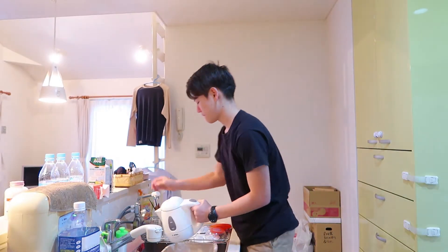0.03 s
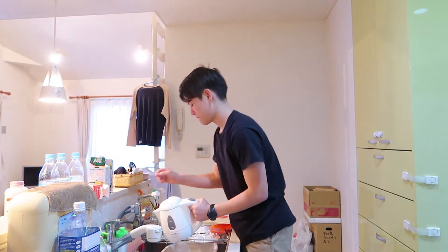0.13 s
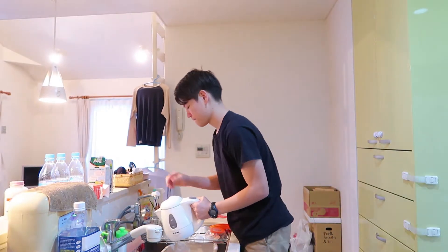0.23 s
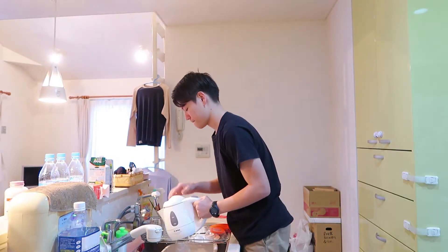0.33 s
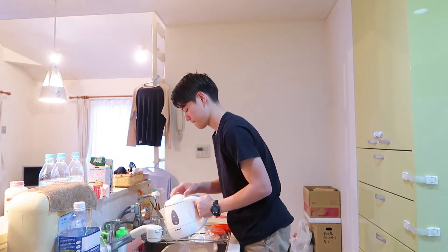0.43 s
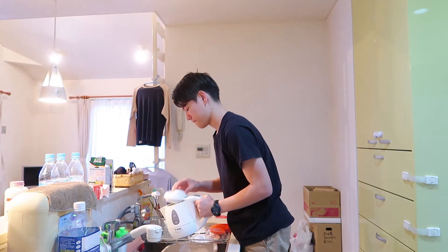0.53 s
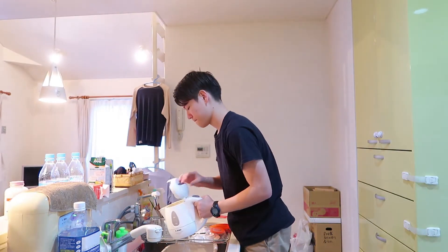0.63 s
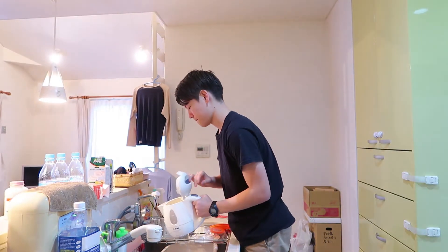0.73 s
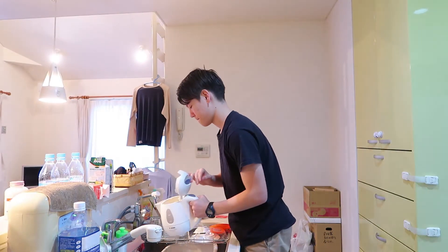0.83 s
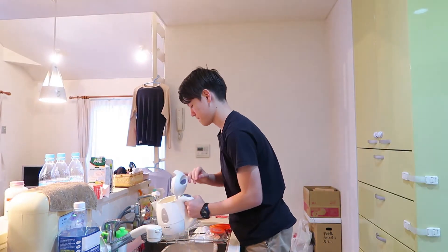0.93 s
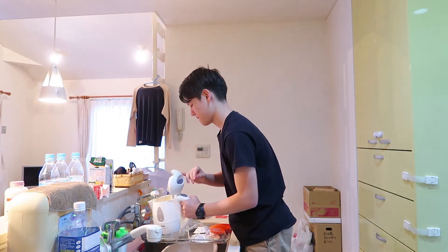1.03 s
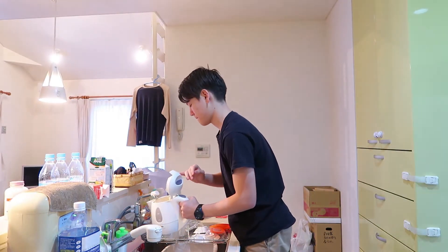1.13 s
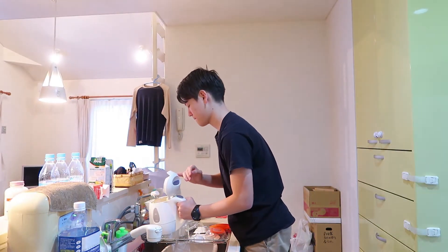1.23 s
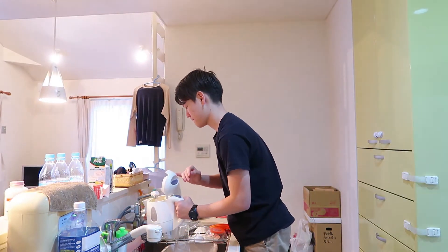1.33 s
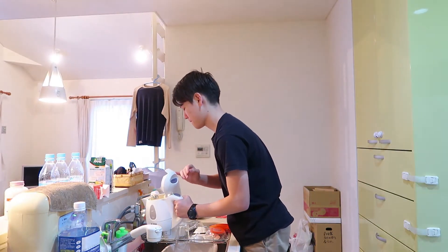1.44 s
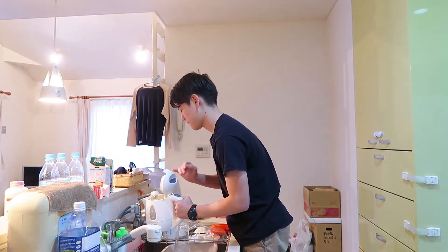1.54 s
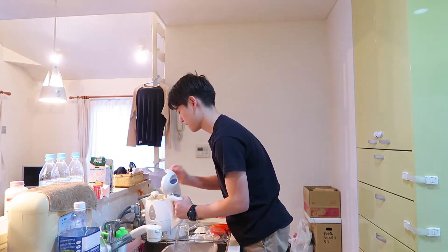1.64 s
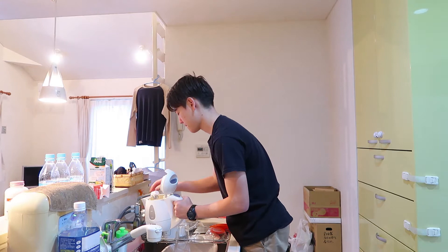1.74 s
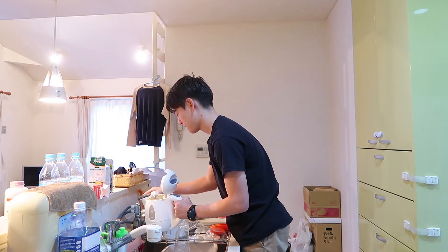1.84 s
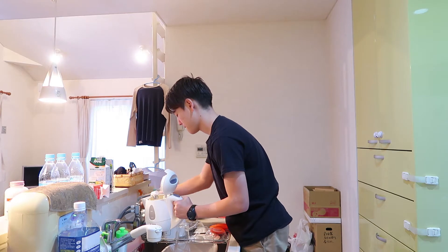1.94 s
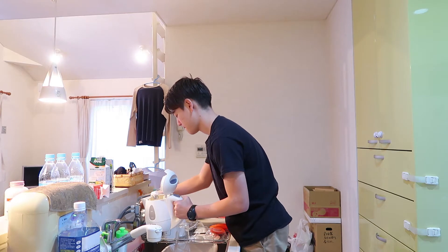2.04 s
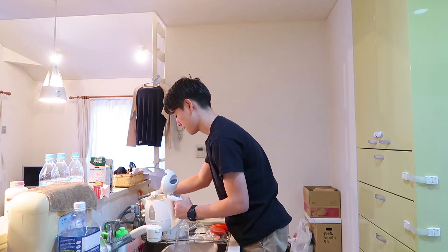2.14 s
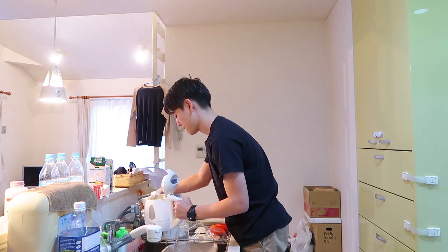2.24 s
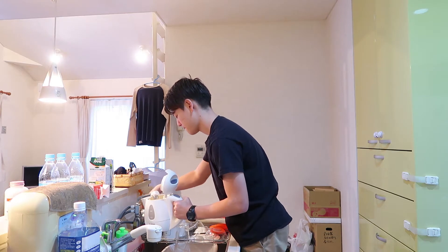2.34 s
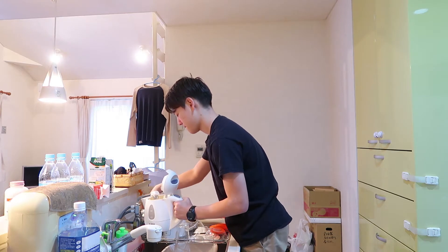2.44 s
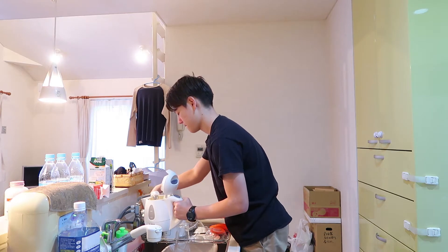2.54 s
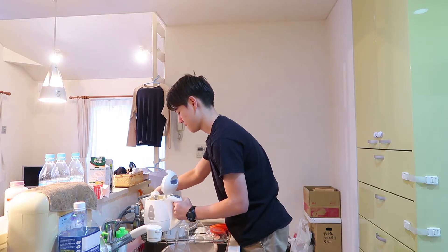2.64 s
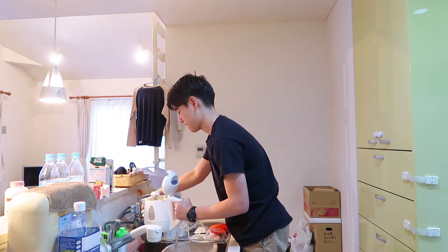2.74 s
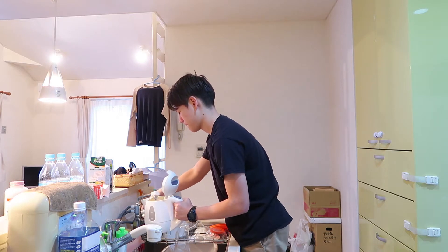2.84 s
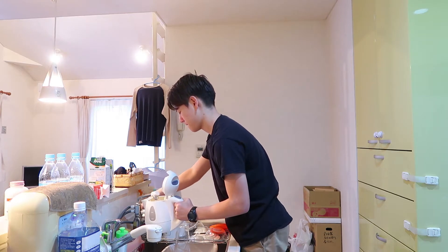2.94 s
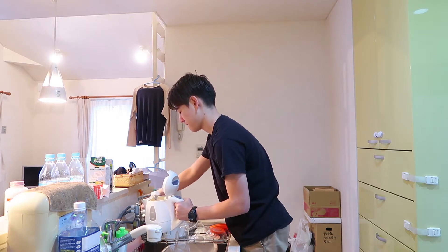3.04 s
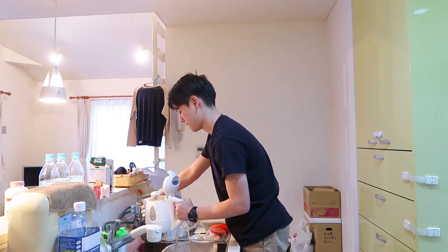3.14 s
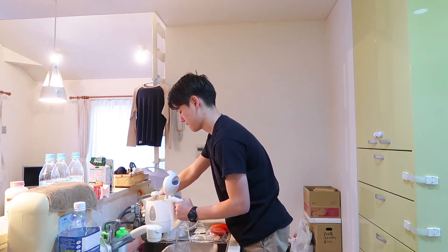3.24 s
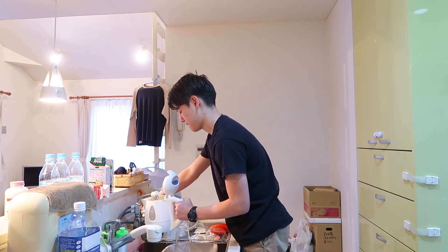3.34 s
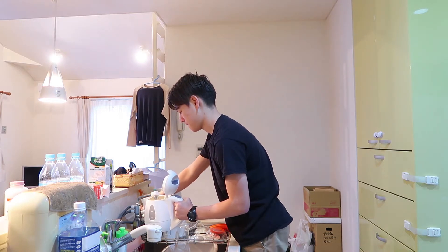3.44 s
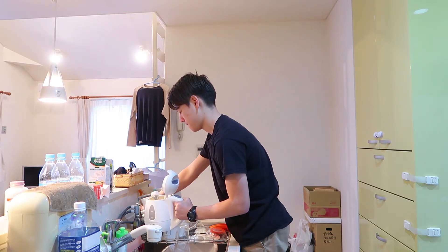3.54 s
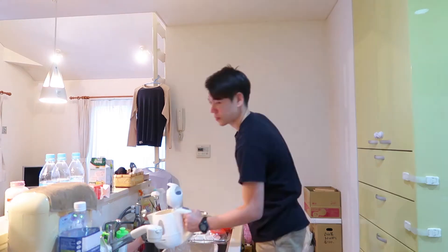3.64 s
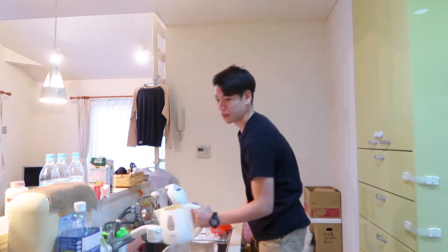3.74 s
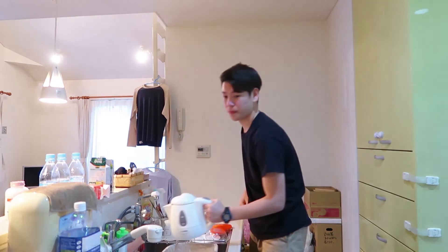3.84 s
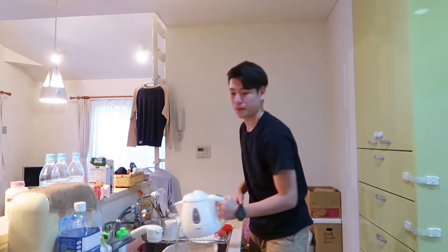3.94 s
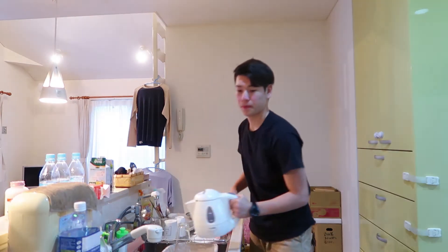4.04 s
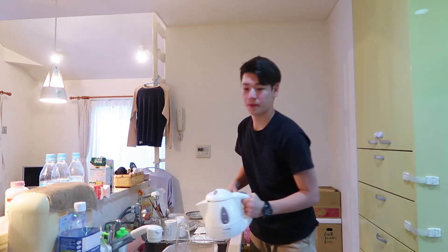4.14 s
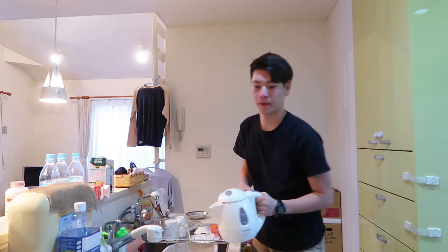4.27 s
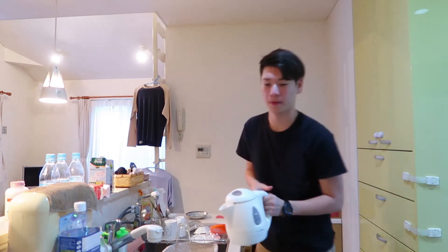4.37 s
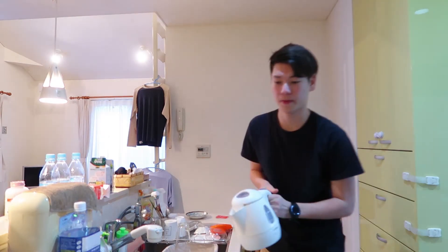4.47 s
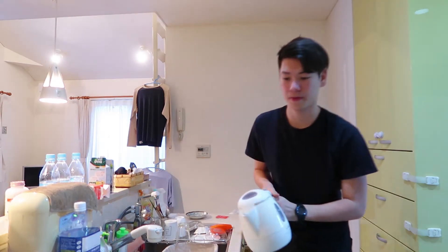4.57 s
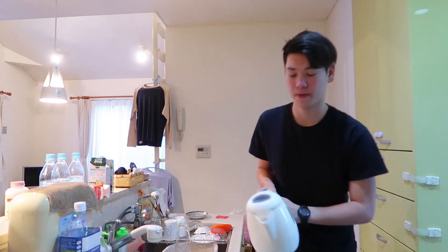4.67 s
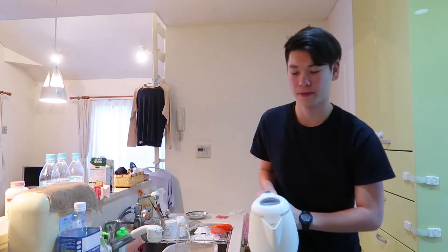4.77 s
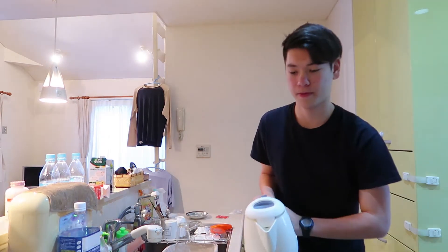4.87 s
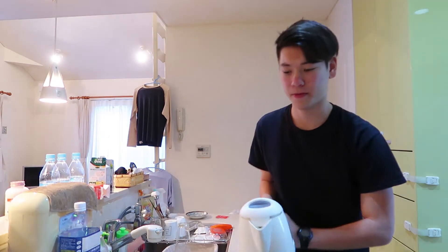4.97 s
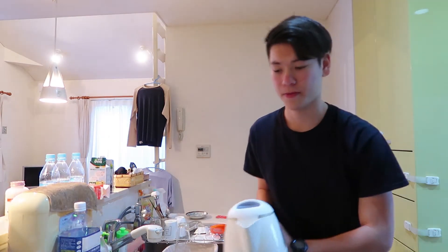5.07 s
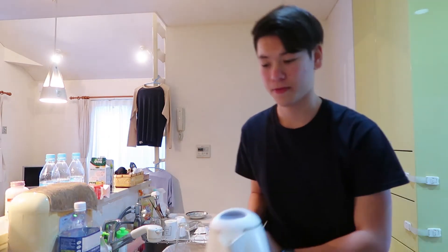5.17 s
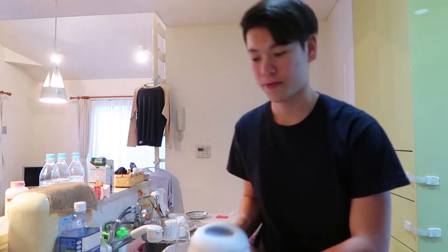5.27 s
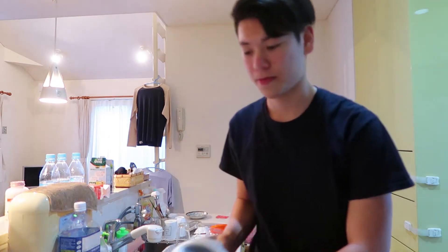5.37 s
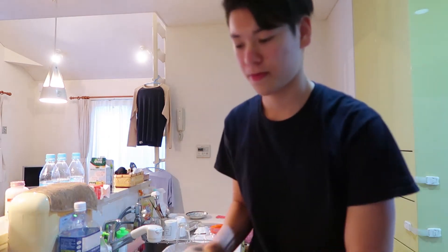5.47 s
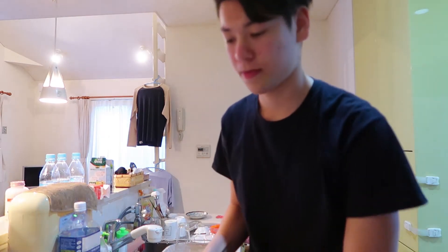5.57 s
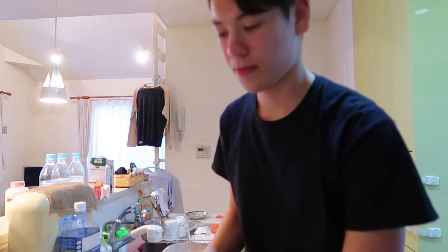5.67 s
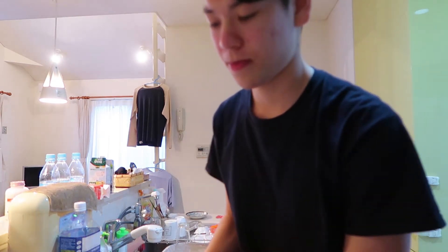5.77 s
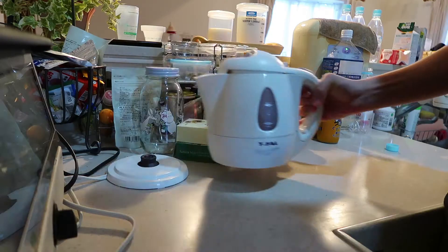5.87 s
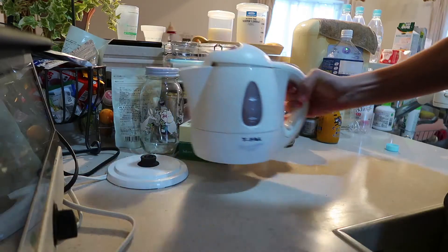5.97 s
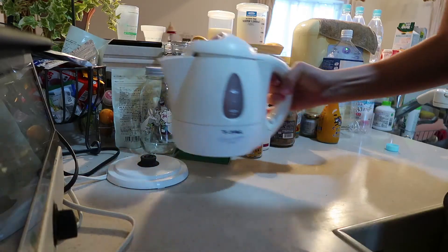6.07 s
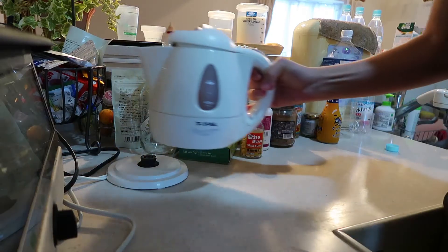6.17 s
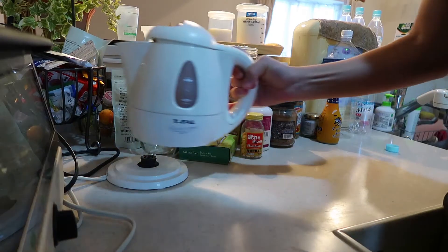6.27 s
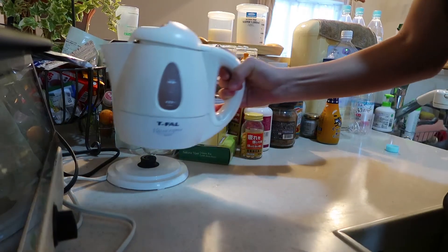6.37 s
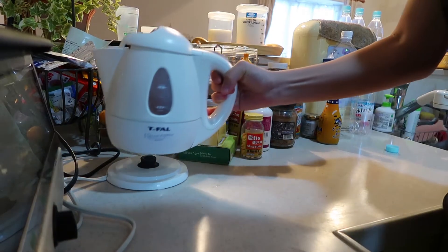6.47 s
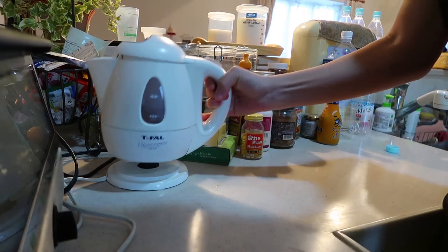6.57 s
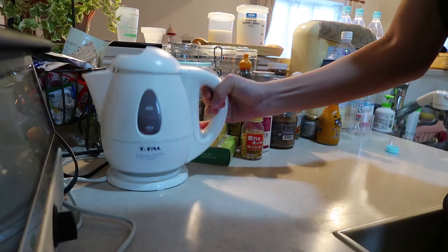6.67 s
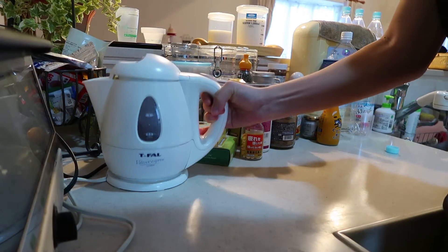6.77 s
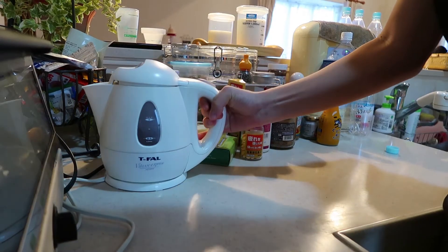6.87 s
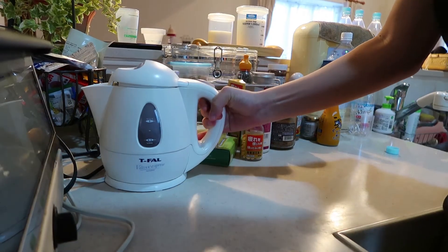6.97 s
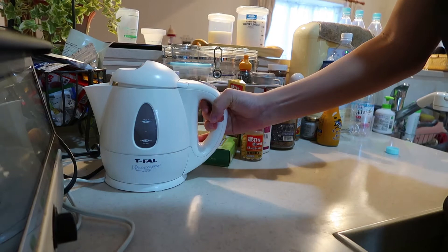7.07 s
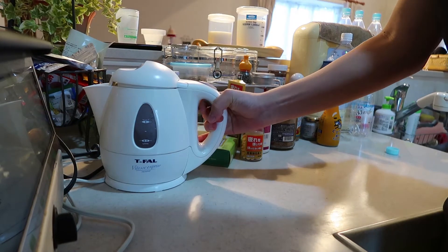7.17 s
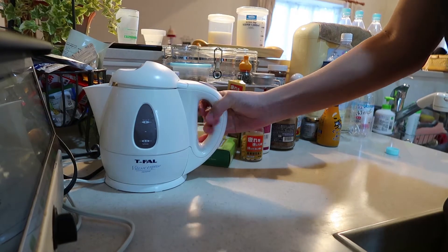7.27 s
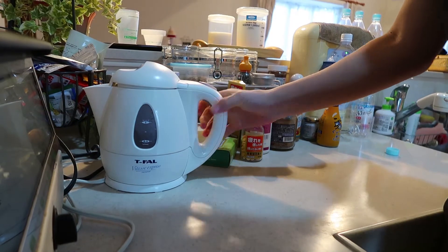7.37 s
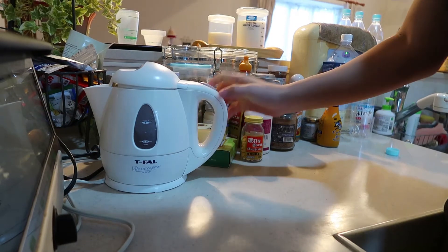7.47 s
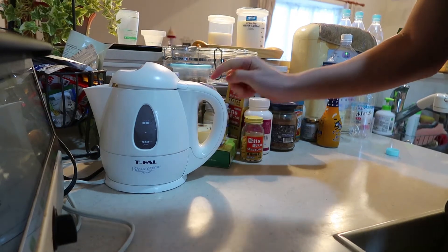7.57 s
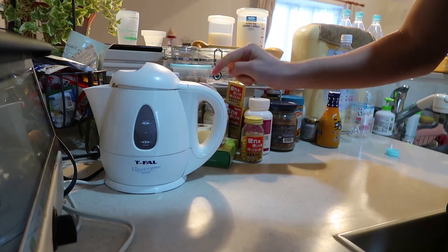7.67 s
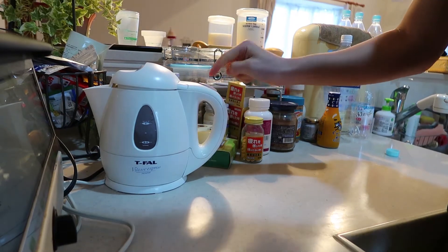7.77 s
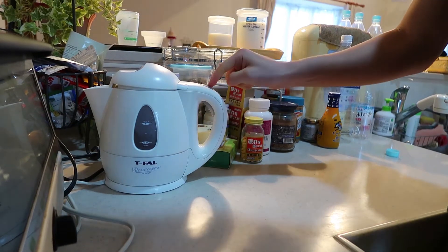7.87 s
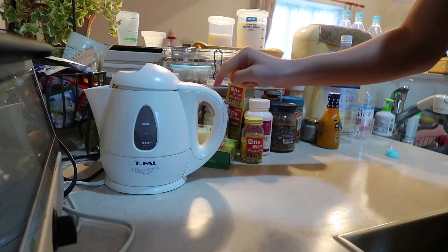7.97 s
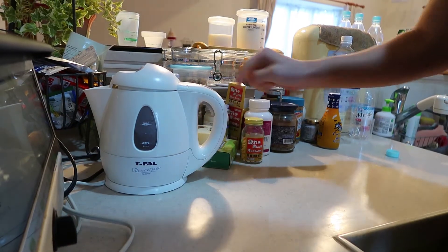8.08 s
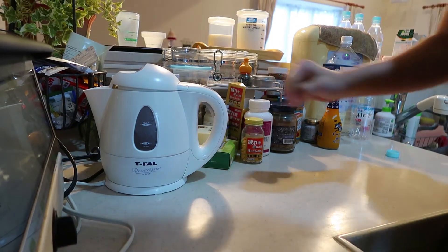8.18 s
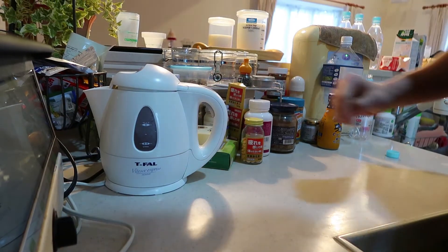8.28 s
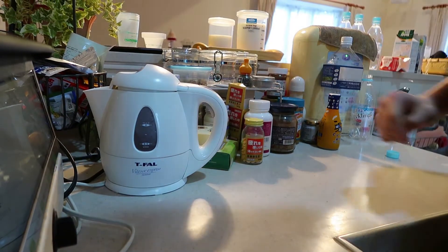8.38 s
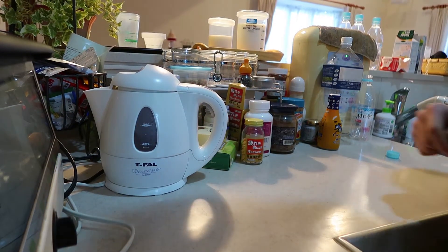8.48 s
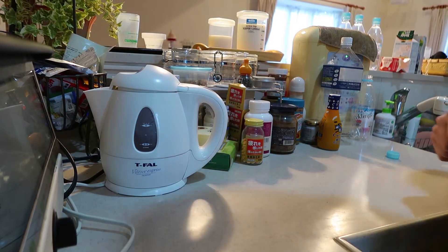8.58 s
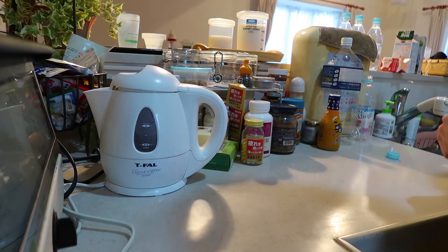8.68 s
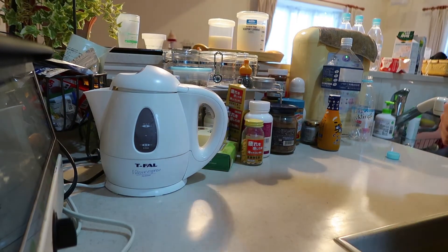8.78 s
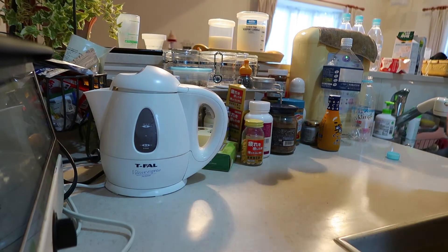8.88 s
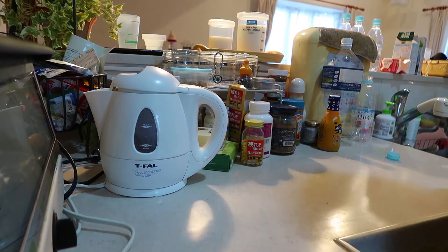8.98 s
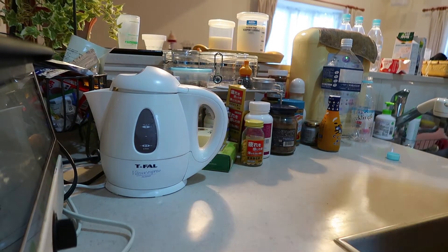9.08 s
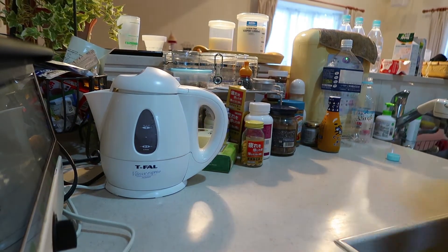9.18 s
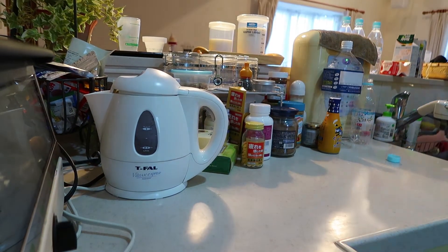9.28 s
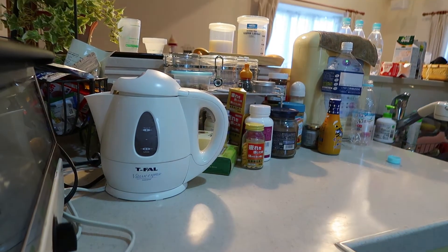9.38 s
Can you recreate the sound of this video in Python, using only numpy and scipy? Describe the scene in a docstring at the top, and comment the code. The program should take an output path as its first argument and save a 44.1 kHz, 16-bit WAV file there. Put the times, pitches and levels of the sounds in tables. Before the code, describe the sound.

In a small lively kitchen, a plastic jug is opened, filled from a tap, snapped shut, carried with squeaks, banged down and switched on.

```python
"""A plastic electric kettle is opened at a kitchen sink, filled from the tap and snapped shut: struck modes, then
resonant water noise. It is carried past the counter with knocks, squeaks and clatter, seated on its base with a
boom, and switched on. Near the end the room tone gives way to a faint hum and hiss, with one last bump.
Dense reflections of a small room follow nearly every blow; the loudest duck the whole sound and clip."""
import sys
import numpy as np
from scipy import signal
from scipy.fft import rfft, irfft, next_fast_len
from scipy.io import wavfile
from scipy.ndimage import uniform_filter1d

SR = 44100
rng = np.random.default_rng(int(sys.argv[2]) if len(sys.argv) > 2 else 0)


def to_wav(sig):
    """Store sig (one row per channel, or 1-D mono) as 16-bit WAV at the path in sys.argv[1].

    Samples outside -1..1 are clipped; the rate is SR.
    """
    pcm = np.clip(np.atleast_2d(sig), -1, 1) * 32767
    pcm = np.round(pcm).astype(np.int16)
    wavfile.write(sys.argv[1], SR, pcm.T)  # frames by channels


N = 414981
TIME = np.arange(N) / SR
BLOW_TIME = np.arange(next_fast_len(SR // 4)) / SR
CONTACT_S = 0.0015  # soft plastic takes this long to load
SNAP_RING_T60_S = 0.017  # the hand damps the latch and the switch
SLIP_RISE_S, SLIP_T60_S = 0.006, 0.1  # envelope of scrapes and squeaks


def knocks():
    """All blows: lid, latch and counter are roomiest, clatter, base and switch drier, the last bump dry."""
    roomy = lid_blows() + latch_blows() + counter_blows()
    near = clatter_blows() + base_blows() + switch_blows()
    wet = kitchen(roomy, wet_db=-2.5) + kitchen(near, wet_db=-7.5) + kitchen(finger_ticks(), wet_db=-9)
    return wet + last_bump()


# blows on the lid: start_s, level_db, thump_rel_db, crack_rel_db, pitch_factor (where it is struck)
LID_HITS = [(0.003,-22,-20,-15,0.86),(0.109,3,-18,-20,1.006),(0.451,-31,-8,-15.5,0.61),(0.759,-27,-21,-24,0.91),(0.796,-26.5,-30.5,-18,0.7),(1.101,-17,-19.5,-18,0.92),(1.5097,-28.5,-6.5,-31,1),(1.528,-26,-5,-29,0.95),(1.586,-36,0.5,-35,0.71),(2.357,-28,-9.5,-25,1.18)]
# ringing of the plastic shell: freq_hz, level_db
SHELL_MODES = [(790,-11),(1250,1),(1520,-18.5),(1940,5.5),(2240,-7),(3100,-4.5),(3500,-8)]
# dense rattle of the lid: freq_hz, level_db_per_hz
LID_RATTLE = [(300,-6),(500,-11),(1100,-6.5),(1950,-2.5),(2700,-9.5),(4500,-22.5),(8000,-46)]
# low modes of the hollow jug: freq_hz, level_db, t60_s
JUG_MODES = [(165,-10,0.2),(229,1.5,0.1),(310,9.5,0.013)]


def lid_blows():
    """The lid strikes the jug: shell modes and rattle over the hollow body."""
    return blows(LID_HITS, SHELL_MODES, LID_RATTLE, JUG_MODES,
                 ring_db=-14, rattle_db=-13.5, rattle_t60_s=0.099)


def lid_ring(freq_hz=1910, half_width_hz=70, rel_db=-23.5, t60_s=0.42):
    """A close cluster of lid modes, a narrow noise band, sings on after each blow."""
    ring = sum(amp(db + rel_db) * stroke(s, 0, CONTACT_S, t60_s) for s, db, *_ in LID_HITS)
    return ring * resonant(rng.standard_normal((2, N)), [(freq_hz, half_width_hz, 0)])


# blows of the latch: start_s, level_db, thump_rel_db, crack_rel_db
LATCH_HITS = [(3.9282,0,-20,-19),(4.173,-42,-21,-3.5),(4.817,-37,-14,-8)]
# ringing of the latch: freq_hz, level_db
LATCH_MODES = [(318,-2.5),(790,-1),(1230,2),(1480,3.5),(1930,3.5),(3350,-6.5)]
# dense rattle of the latch: freq_hz, level_db_per_hz
LATCH_RATTLE = [(180,-1.5),(320,-1.5),(520,-7.5),(1250,-0.5),(3500,-1),(4800,-14.5),(8000,-30.5)]


def latch_blows():
    """The latch snaps: hand-damped modes and a short rattle over the hollow jug."""
    return blows(LATCH_HITS, LATCH_MODES, LATCH_RATTLE, JUG_MODES,
                 ring_db=-14, ring_t60_s=SNAP_RING_T60_S, rattle_db=-9.5, rattle_t60_s=0.028)


# knocks on the counter: start_s, level_db, thump_rel_db, crack_rel_db
COUNTER_HITS = [(5.094,-12.5,-26,-56),(5.108,-26,-16,-41),(5.513,-29.5,-6,-24)]
# ringing of the counter: freq_hz, level_db
COUNTER_MODES = [(670,-12),(830,-12),(1090,-4)]
# dense rattle of the counter: freq_hz, level_db_per_hz
COUNTER_RATTLE = [(250,-4.5),(480,-14.5),(1050,-6),(2400,-10.5),(3300,-27.5),(8000,-41)]
# low modes of the jug standing on the counter: freq_hz, level_db, t60_s
SEATED_MODES = [(120.5,-3,0.079),(226,1.5,0.098)]


def counter_blows():
    """The counter is knocked: a quicker contact excites its modes and rattle."""
    return blows(COUNTER_HITS, COUNTER_MODES, COUNTER_RATTLE, SEATED_MODES,
                 ring_db=-12.5, rattle_db=-9, rattle_t60_s=0.043, contact_s=0.00078)


# clatter: start_s, level_db, thump_rel_db, crack_rel_db
CLATTER_HITS = [(5.929,-15,-18,-42)]
# dense rattle of the clatter: freq_hz, level_db_per_hz
CLATTER_RATTLE = [(300,-4),(900,-5.5),(2900,-8),(5000,-27.5),(8000,-36.5)]


def clatter_blows():
    """The shell clatters: nearly all rattle, hardly any clear ring."""
    return blows(CLATTER_HITS, SHELL_MODES, CLATTER_RATTLE, SEATED_MODES, ring_db=-42, rattle_db=-11.5)


# blows on the base: start_s, level_db, thump_rel_db (before thump_db), crack_rel_db
BASE_HITS = [(6.8153,10,-15,-34),(6.8689,-1.5,-10.5,-33.5),(6.876,-7.5,-28,-26),(6.9235,7.5,-34,-31),(6.955,-17,-6,-33),(7.055,-14,-8.5,-39)]
# ringing of the kettle against its base: freq_hz, level_db
BASE_MODES = [(393,-6),(560,-4),(1300,4.5),(1540,0.5),(1780,1.5),(2050,2)]
# dense rattle of kettle and base: freq_hz, level_db_per_hz
BASE_RATTLE = [(110,14),(300,-6),(1900,0.5),(3500,-10.5),(6500,-31)]
# low modes of the counter top: freq_hz, level_db, t60_s
WORKTOP_MODES = [(73.55,-5,0.11),(109.8,-2,0.065),(145,6,0.03)]


def base_blows():
    """The kettle lands on its base: short ring, rattle and crack over a strong worktop thump."""
    return blows(BASE_HITS, BASE_MODES, BASE_RATTLE, WORKTOP_MODES, ring_db=-17, rattle_db=-14.5,
                 thump_db=5, rattle_t60_s=0.018, ring_t60_s=0.021, crack_t60_s=0.012)


# blows of the switch: start_s, level_db, thump_rel_db, crack_rel_db
SWITCH_HITS = [(7.9205,-4,-25.5,-39.5),(7.923,-11.5,-9,-33)]
# ringing of the switch: freq_hz, level_db
SWITCH_MODES = [(540,7.3),(850,3),(1240,3.6),(1420,4),(2430,1)]
# dense rattle of the switch: freq_hz, level_db_per_hz
SWITCH_RATTLE = [(140,-5),(330,-8),(1900,3.5),(4600,-8.5),(7000,-25.5)]


def switch_blows():
    """The switch snaps: hand-damped modes over the upper worktop modes."""
    return blows(SWITCH_HITS, SWITCH_MODES, SWITCH_RATTLE, WORKTOP_MODES[1:],
                 ring_db=-14, rattle_db=-8, rattle_t60_s=0.035, ring_t60_s=SNAP_RING_T60_S)


# plastic ticks under the fingers: start_s, level_db
TICKS = [(2.122,-34),(4.424,-30),(4.464,-29),(5.345,-31),(5.376,-33),(5.465,-37),(6.1138,-28),(6.164,-29.5),(6.210,-34),(7.371,-30),(7.406,-33.5),(7.467,-35)]
# ringing of a tick: freq_hz, level_db
TICK_MODES = [(1900,1.3),(2300,3.6)]


def finger_ticks():
    """Plastic ticks under the fingers: very short high modes, little thump or crack."""
    hits = [(s, db, -25, -28) for s, db in TICKS]
    return blows(hits, TICK_MODES, CLATTER_RATTLE, JUG_MODES, ring_db=-21, rattle_db=-19, ring_t60_s=0.012)


# last bump: start_s, level_db, thump_rel_db, crack_rel_db
BUMP_HITS = [(9.312, -19, -18, -32)]
# ringing of the bump: freq_hz, level_db
BUMP_MODES = [(570,3),(1230,-6)]
# dense rattle of the bump: freq_hz, level_db_per_hz
BUMP_RATTLE = [(250,0),(900,-8.5),(2500,-19),(15500,-11.5)]


def last_bump():
    """A bump excites two modes, a rattle and the seated jug."""
    return blows(BUMP_HITS, BUMP_MODES, BUMP_RATTLE, SEATED_MODES, ring_db=-16.5, rattle_db=-13.5)


# crack at the contact: freq_hz, level_db_per_hz
CRACK = [(1500,-10),(4200,3),(6500,-5),(12000,-20.5),(16000,-37.5)]


def blows(hits, modes, rattle, low_modes, ring_db=-15, rattle_db=-12, thump_db=0,
          rattle_t60_s=0.072, ring_t60_s=0.05, crack_t60_s=0.13, contact_s=CONTACT_S):
    """Each blow gives a crack at the contact, ringing and rattling plastic, and a low thump."""
    t = BLOW_TIME
    contact = 1 - np.exp(-t / contact_s)
    thump = sized(sum((-1) ** k * amp(db) * dying(t60_s) * np.sin(2 * np.pi * f * t)
                      for k, (f, db, t60_s) in enumerate(low_modes)))

    def blow(level_db, thump_rel_db, crack_rel_db, pitch=1):
        ring = 0
        for f, mode_db in modes:
            # grip and point of contact detune the shell a little from blow to blow
            mode_hz = f * pitch * rng.uniform(0.99, 1.01)
            ring = ring + amp(mode_db) * np.sin(2 * np.pi * (mode_hz * t + rng.random()))
        sound = amp(ring_db) * sized(ring * contact * dying(ring_t60_s))
        sound = sound + amp(rattle_db) * burst(rattle, rattle_t60_s, contact, pitch)
        sound += amp(thump_rel_db + thump_db) * thump
        sound += amp(crack_rel_db) * burst(CRACK, crack_t60_s, contact)
        return amp(level_db) * sound

    out = np.zeros((2, N))
    for start_s, *settings in hits:
        add(out, start_s, blow(*settings))
    return out


def burst(spectrum, t60_s, contact, pitch=1):
    """Very many overlapping modes: random phases under an even spectrum, then coloured."""
    chatter = rfft(rng.standard_normal((2, len(BLOW_TIME))) * contact * dying(t60_s))
    even = irfft(chatter / abs(chatter), len(BLOW_TIME))
    return sized(paired(even, lambda hz: shape(spectrum, hz / pitch)) * dying(BLOW_TIME[-1]))


def sized(x):
    """Scales to the energy of 20 ms at rms 1."""
    return x / np.sqrt(np.sum(np.atleast_2d(x) ** 2, 1).mean() / (SR // 50))


def dying(t60_s):
    """Exponential decay of a blow."""
    return np.exp(-np.log(1000) * BLOW_TIME / t60_s)


TAP_OPEN_S, TAP_SHUT_S, FLOW_DB = 2.178, 3.65, -39
OPENING_S, SHUTTING_T60_S = 0.16, 0.013
HOLLOW_RISE_DB_PER_S = 5  # the low air modes grow as the jug fills
# patter of the stream: freq_hz, level_db
SPLASH = [(200,-2.5),(520,-12),(1300,-8),(2140,-18.5),(3500,-24.5),(7800,-26),(15000,-58)]
# upper air resonances in the jug: freq_hz, half_width_hz, level_db
CAVITY = [(986,7.4,-3.5),(1444,90,-9),(1940,21,-11),(2275,12,-12),(2656,49,-13.5),(3123,34,-9.5),(4740,13,-13.5),(11240,90,-34)]


def filling():
    """The aerated stream patters into the jug and sounds the air inside it."""
    splash = paired(grains(per_s=3000, spread_db=0), lambda hz: read(SPLASH, hz))
    cavity = resonant(grains(per_s=3300, spread_db=2), CAVITY) * flutter(per_s=25, depth_db=2)
    hollow_peaks = [(236.5, 5.4, 0.5), (276.5, 5.9, -12.5), (431.5, 10, -17)]
    hollow = resonant(grains(per_s=1200, spread_db=0.5), hollow_peaks)
    # steadily driven low air modes: their swells are evened out
    swell = np.sqrt(abs(uniform_filter1d(hollow[0] ** 2, SR // 15)) + 1e-6)
    fill_db = HOLLOW_RISE_DB_PER_S * (np.clip(TIME, TAP_OPEN_S, TAP_SHUT_S) - TAP_SHUT_S)
    flow = amp(FLOW_DB) * stroke(TAP_OPEN_S, TAP_SHUT_S - TAP_OPEN_S, OPENING_S, SHUTTING_T60_S)
    return flow * (amp(-5.5) * splash + amp(-9) * cavity + amp(fill_db) * hollow / swell)


# lid and foot slips: start_s, length_s, level_db, pitch_factor (on the resonances)
SCRAPES = [(0,0.036,-24,0.84),(0.04,0.076,-40,.86),(5.947,0.038,-28.5,0.99),(5.989,0.044,-34.5,0.64),(6.04,0.011,-30.5,0.966),(6.068,0.015,-34.5,1.07)]
# resonances the scraping excites: freq_hz, half_width_hz, level_db
SCRAPE_PEAKS = [(1530,220,-11),(2255,220,1),(2732,510,-11),(4160,1800,-15.5)]


def scraping(sag_per_s=0.7):
    """Lid and foot scrape in short slips: dense tiny impacts drive resonances."""
    out, t = np.zeros((2, N)), TIME[:SR // 2]
    slowing = np.cumsum(np.exp(-sag_per_s * t)) / SR  # pitch sags as each slip slows
    for start_s, length_s, level_db, pitch in SCRAPES:
        peaks = [(f * pitch, width_hz, peak_db) for f, width_hz, peak_db in SCRAPE_PEAKS]
        slips = resonant(grains(per_s=3300, spread_db=-2)[:, :SR // 2], peaks)
        slips = np.array([np.interp(slowing, t, side) for side in slips])
        envelope = stroke(0, length_s, SLIP_RISE_S, SLIP_T60_S)[:SR // 2]
        add(out, start_s, amp(level_db) * envelope * slips)
    return out


# hand strokes: start_s, length_s, level_db
RUBS = [(0,0.23,-42),(1.125,0.13,-45),(1.23,0.22,-60),(3.694,0.532,-58),(4.447,1.23,-55.5),(4.588,0.045,-49)]
# colour of the rubbing: freq_hz, level_db_per_hz
RUB = [(650,3.5),(2200,1.5),(4000,-4),(15000,-35)]


def rubbing(rise_s=0.056, t60_s=0.078):
    """Hands rub over the plastic: wavering showers of tiny impacts, with room."""
    strokes = sum(amp(db) * stroke(s, length_s, rise_s, t60_s) for s, length_s, db in RUBS)
    texture = paired(grains(per_s=580, spread_db=2.5), lambda hz: shape(RUB, hz))
    return kitchen(strokes * flutter(per_s=40, depth_db=3.5) * texture, wet_db=0.5)


# jolts of the jug: start_s, level_db
SLOSHES = [(1.113,-31),(2.5,-36),(5.08,-37.5),(7.06,-29)]
# colour of the sloshing: freq_hz, level_db_per_hz
SLOSH = [(30,-7),(130,-5.5),(300,-6.5),(420,-22),(1200,-28)]


def sloshing(rise_s=0.015, t60_s=1.0):
    """Each jolt sets the water in the jug shifting: low noise that dies away."""
    return sum(amp(db) * stroke(s, rise_s, rise_s, t60_s) for s, db in SLOSHES) * noise(SLOSH)


# handle squeaks: start_s, length_s, level_db
SQUEAKS = [(4.935,0.032,-47.5),(5.046,0.022,-46),(5.318,0.065,-41.5),(5.464,0.029,-42),(5.67,0.0089,-40.5)]


def squeaks(pitch_hz=647, db_per_octave=-9.5):
    """The handle sticks and slips under the weight of the water: short, slightly unsteady tones."""
    turns = np.cumsum(pitch_hz * flutter(per_s=150, depth_db=0.3)) / SR
    tone = sum(amp(db_per_octave * np.log2(k)) * np.sin(2 * np.pi * k * turns) for k in range(1, 5))
    return sum(amp(db) * stroke(s, length_s, SLIP_RISE_S, SLIP_T60_S) for s, length_s, db in SQUEAKS) * tone


# jug swung against the sink: start_s, level_db
THUDS = [(0,-23.5),(1.11,-32)]
# colour of the thuds: freq_hz, level_db_per_hz
THUD = [(50,5.5),(110,-8.5)]


def thuds(rise_s=0.0083, t60_s=0.18):
    """Dull thuds of the jug swung against the sink: bursts of bass noise."""
    return sum(amp(db) * stroke(s, rise_s, rise_s, t60_s) for s, db in THUDS) * noise(THUD)


# counter resonances: freq_hz, half_width_hz, level_db
BOOM = [(108.5,4.2,4),(177,9.4,-9)]


def counter_boom(level_db=-23.5, rise_s=0.0083, t60_s=0.62):
    """The counter booms on under the seated kettle: noise through narrow resonances."""
    first_s, last_s = BASE_HITS[0][0], BASE_HITS[-1][0]
    envelope = amp(level_db) * stroke(first_s, last_s - first_s, rise_s, t60_s)
    return envelope * resonant(rng.standard_normal((2, N)), BOOM)


HISS_START_S, ROOM_DB, HISS_DB = 9.19, -48.5, -48.5
# room tone: freq_hz, level_db_per_hz
ROOM_TONE = [(25,-13),(48,-1),(125,-9),(231,-15.5),(335,-10.5),(404,-19),(4150,-33.5),(13000,-47),(15000,-66.5)]
# hiss: freq_hz, level_db_per_hz
HISS = [(40, -9), (250, 7.5), (1500, -6.5), (15500, -14.5)]
# hum: freq_hz, level_db (rms)
HUM = [(220.7, -61), (436.0, -61)]


def background():
    """A low room tone gives way to a faint hum and a bright hiss."""
    late = np.clip((TIME - HISS_START_S) / 0.006, 0, 1)
    hum = sum(amp(db) * np.sqrt(2) * np.sin(2 * np.pi * f * TIME) for f, db in HUM)
    room = amp(ROOM_DB) * noise(ROOM_TONE)
    return (1 - late) * room + late * (amp(HISS_DB) * noise(HISS) + hum)


# reverberation of the room: freq_hz, t60_s
ROOM_T60 = [(100,0.29),(300,0.37),(1600,0.26),(5000,0.25),(12000,0.15)]


def kitchen(x, wet_db, build_s=0.0013):
    """Dense reflections from hard walls and cupboards, even in colour, each band dying at its own speed."""
    hz, t, z = signal.stft(paired(rng.standard_normal((2, SR))), SR, nperseg=256)
    decay = np.exp(-np.log(1000) * t / read(ROOM_T60, hz)[:, None])
    tail = rfft(signal.istft(z * decay, SR, nperseg=256)[1][:, :SR])
    # the tail lasts 1 s, so bin number = Hz
    colour = uniform_filter1d((abs(tail) ** 2).mean(0), size=60) / read(ROOM_T60, np.arange(tail.shape[1]))
    build_up = 1 - np.exp(-(TIME[:SR // 2] / build_s) ** 2)
    tail = irfft(tail / np.sqrt(colour))[:, :SR // 2] * build_up
    return x + amp(wet_db) * signal.fftconvolve(x[:1], tail / np.linalg.norm(tail[0]), axes=1)[:, :N]


# likeness of the two channels: freq_hz, correlation
LIKENESS = [(100,.99),(2400,.96),(4500,.6),(9000,0)]


def paired(x, colour=lambda hz: 0 * hz):
    """Colours two unrelated signals and makes them alike in the bass, as two close microphones hear them."""
    hz = np.fft.rfftfreq(x.shape[1], 1 / SR)
    same = np.clip(read(LIKENESS, hz), -1, 1)
    mid, side = rfft(x) * amp(colour(hz)) * np.sqrt([1 + same, 1 - same])
    return evened(irfft(np.array([mid + side, mid - side]), x.shape[1]))


def noise(spectrum):
    """Stereo noise of a given spectrum."""
    return paired(rng.standard_normal((2, N)), lambda hz: shape(spectrum, hz))


def grains(per_s, spread_db):
    """Random tiny impacts of uneven size."""
    sizes = amp(spread_db * np.minimum(rng.exponential(1, N), 4))
    return evened(rng.standard_normal((2, N)) * sizes * (rng.random(N) < per_s / SR))


def resonant(x, peaks):
    """Passes a drive through resonances: freq_hz, half_width_hz, level_db."""
    def colour(hz):
        return 20 * np.log10(sum(amp(db) / (1 + ((hz - f) / w) ** 2) for f, w, db in peaks))
    return paired(x, colour)


def stroke(start_s, length_s, rise_s, t60_s):
    """Gain over time: rises, holds until its length is over, then dies away."""
    age = TIME - start_s
    return np.clip(age / rise_s, 0, 1) * np.exp(-np.log(1000) * np.maximum(age - length_s, 0) / t60_s)


def flutter(per_s, depth_db):
    """A gain that wavers at random."""
    steps = rng.standard_normal(N // 100)
    return evened(amp(depth_db * np.interp(TIME * per_s, np.arange(len(steps)), steps)))


def shape(spectrum, hz):
    """A spectrum in dB that falls 12 dB an octave beyond its ends."""
    beyond = abs(np.log2((hz + 1) / np.clip(hz + 1, spectrum[0][0], spectrum[-1][0])))
    return read(spectrum, hz) - 12 * beyond


def read(points, hz):
    """Reads a curve on a log-frequency axis."""
    f, value = np.transpose(points)
    return np.interp(np.log(hz + 1), np.log(f + 1), value)


def amp(db):
    """Decibels to gain."""
    return 10 ** (np.asarray(db) / 20)


def evened(x):
    """Scales to rms 1."""
    return x / np.sqrt(np.mean(x ** 2) + 1e-20)


def add(mix, start_s, sound):
    """Mixes a stereo sound in at its start time."""
    part = mix[:, max(round(start_s * SR), 0):][:, :sound.shape[1]]
    part += sound[:, :part.shape[1]]


def scene():
    """All sources, a touch to the left."""
    mix = knocks() + lid_ring() + filling() + scraping() + rubbing() + sloshing()
    mix += squeaks() + thuds() + counter_boom() + background()
    return mix * amp([[0.2], [-0.2]])


def record(dry, threshold_db=-19, squeeze=0.58, recovery_db_per_s=9, attack_s=0.0095,
           low_cut_hz=35, edge_hz=15900):
    """Cuts the deepest bass; gain falls fast and recovers slowly; remaining peaks clip; then the band limit."""
    dry = signal.sosfilt(signal.butter(2, low_cut_hz, "high", fs=SR, output="sos"), dry)
    pole = np.exp(-1 / (attack_s * SR))
    power = signal.lfilter([1 - pole], [1, -pole], (dry ** 2).mean(0))
    power_db = 10 * np.log10(power + 1e-12)
    recovery_db = TIME * recovery_db_per_s
    held_db = np.maximum.accumulate(power_db + recovery_db) - recovery_db
    over_db = np.maximum(held_db - threshold_db, 0)
    ducked = dry / amp(squeeze * signal.lfilter([1 - pole], [1, -pole], over_db))
    band_limit = signal.firwin(255, edge_hz, window=("kaiser", 8), fs=SR)
    return signal.oaconvolve(np.clip(ducked, -1, 1), band_limit[None], "same")


dry = scene()
out = record(dry)
to_wav(out)
```